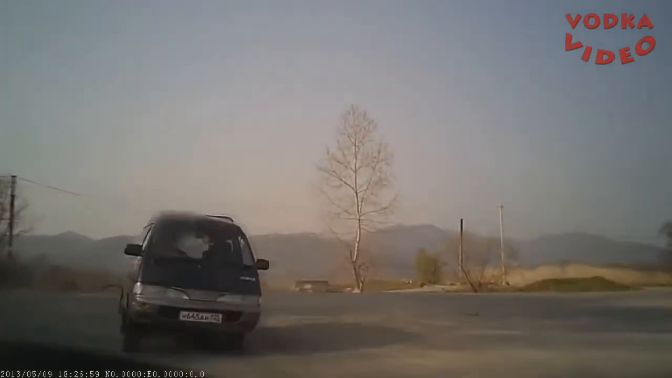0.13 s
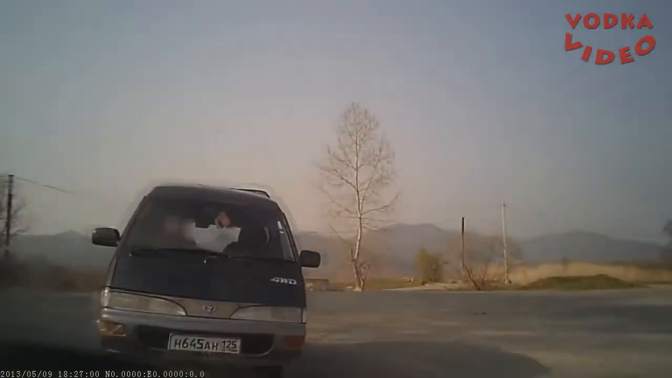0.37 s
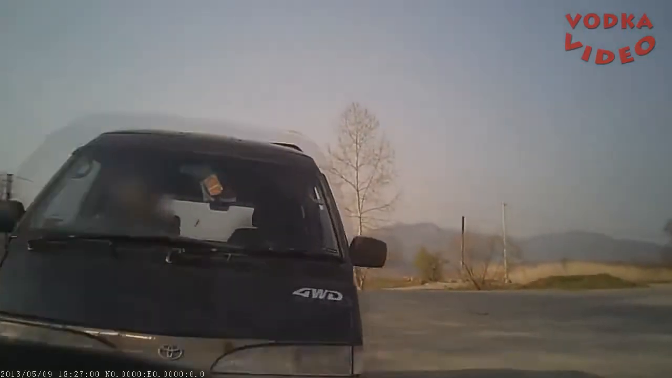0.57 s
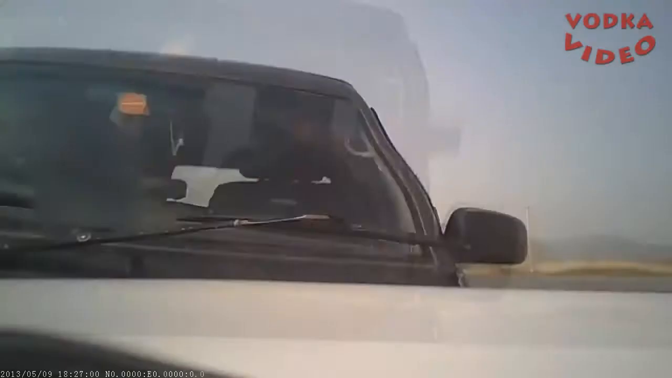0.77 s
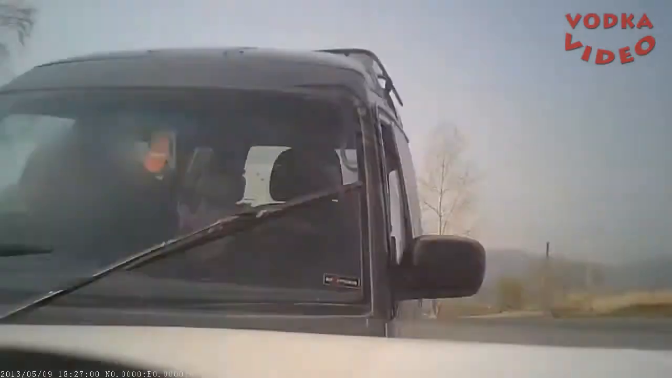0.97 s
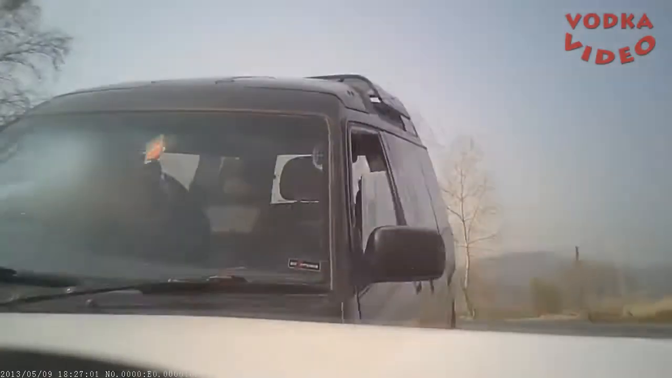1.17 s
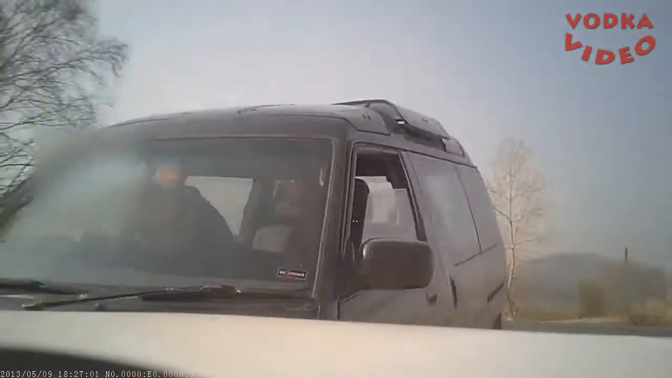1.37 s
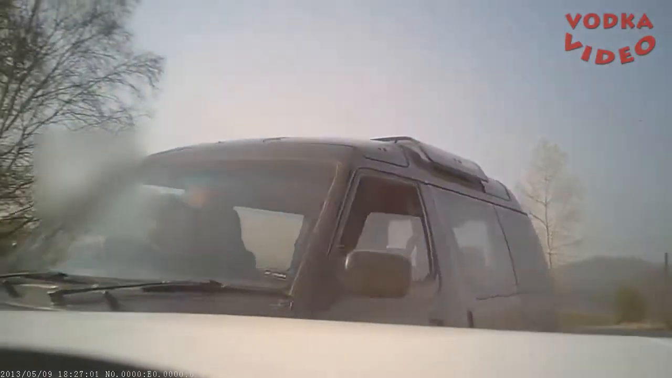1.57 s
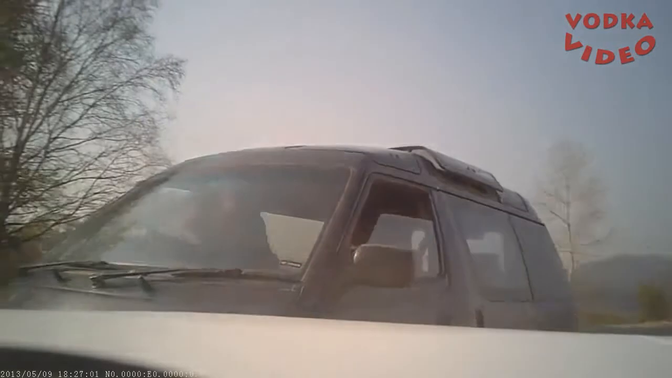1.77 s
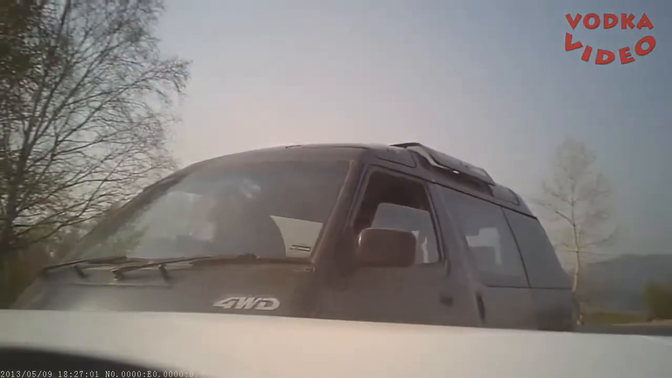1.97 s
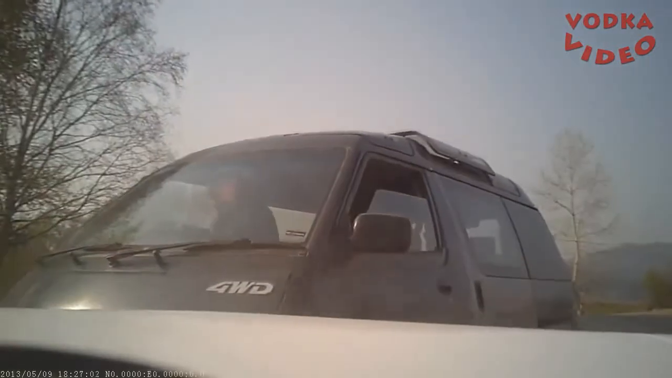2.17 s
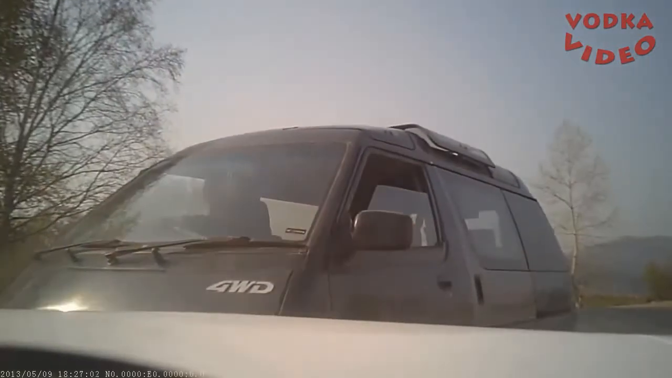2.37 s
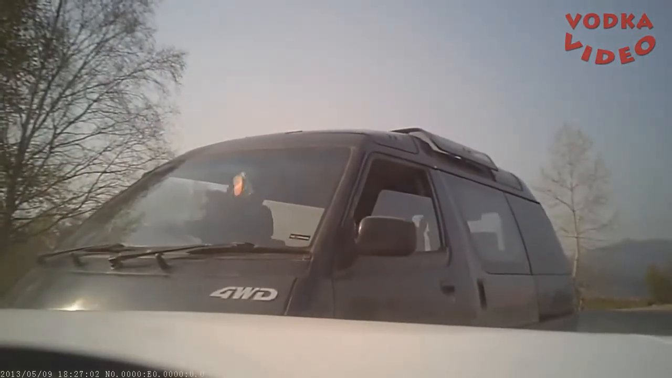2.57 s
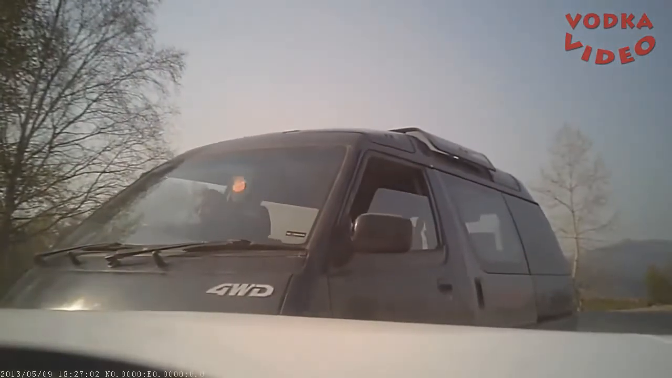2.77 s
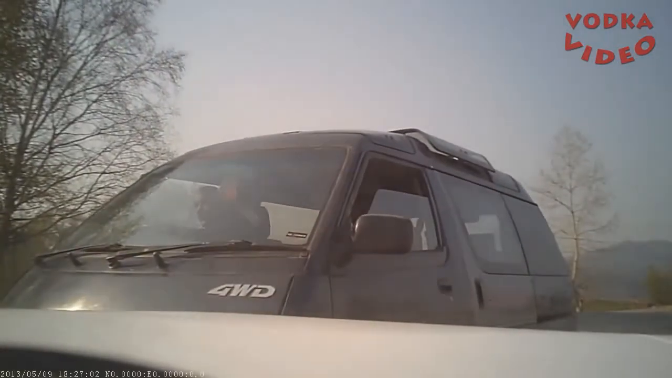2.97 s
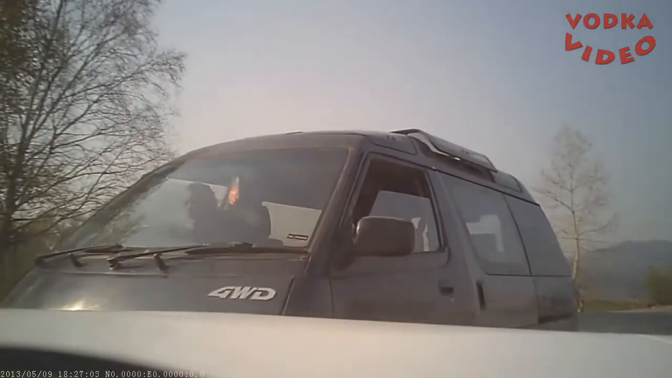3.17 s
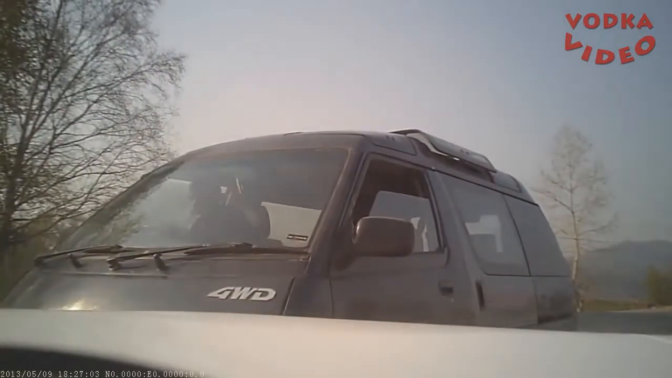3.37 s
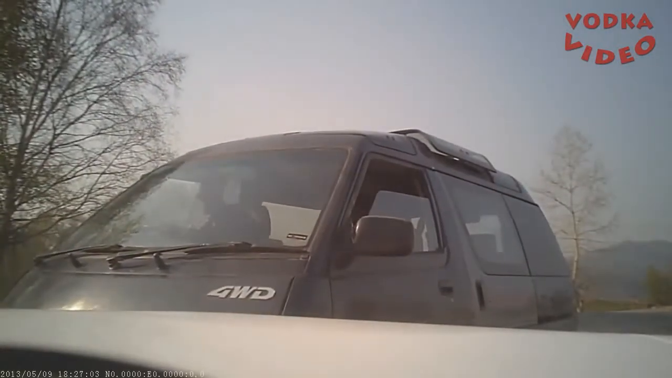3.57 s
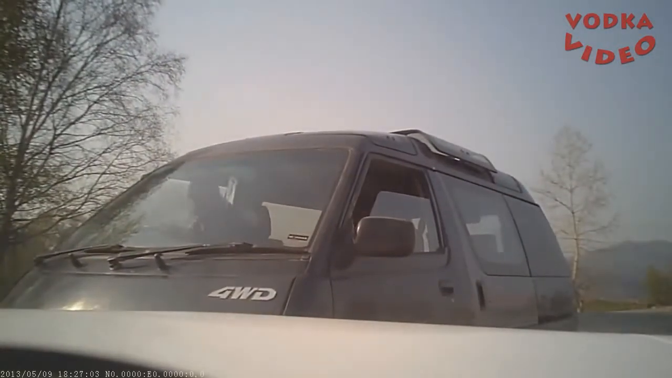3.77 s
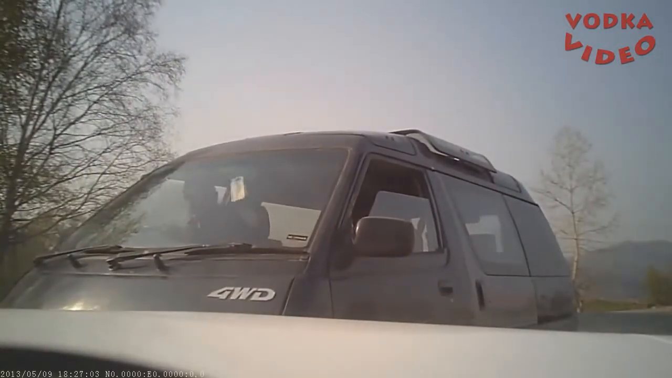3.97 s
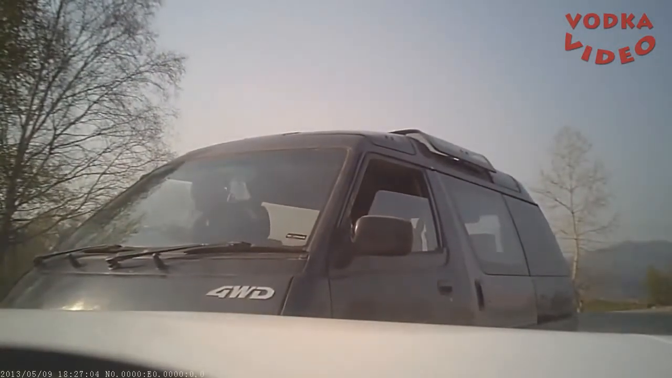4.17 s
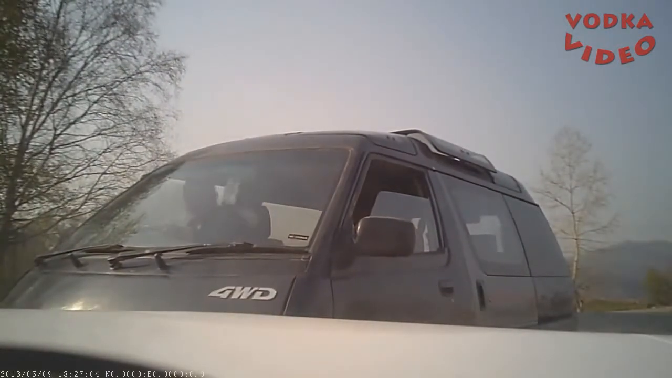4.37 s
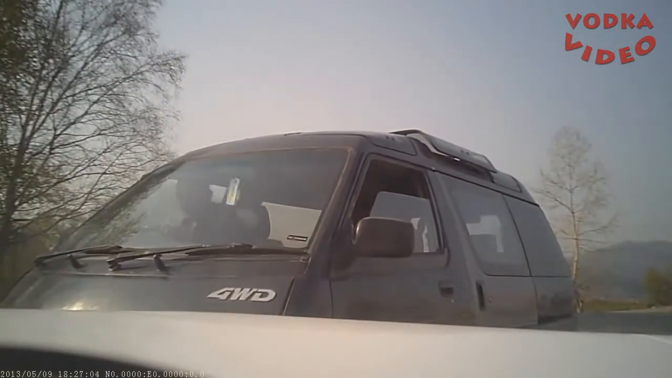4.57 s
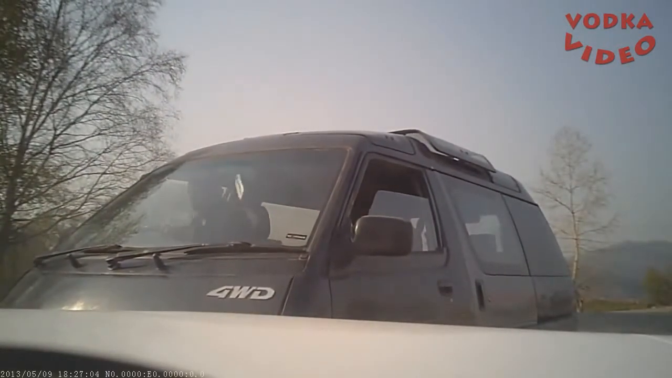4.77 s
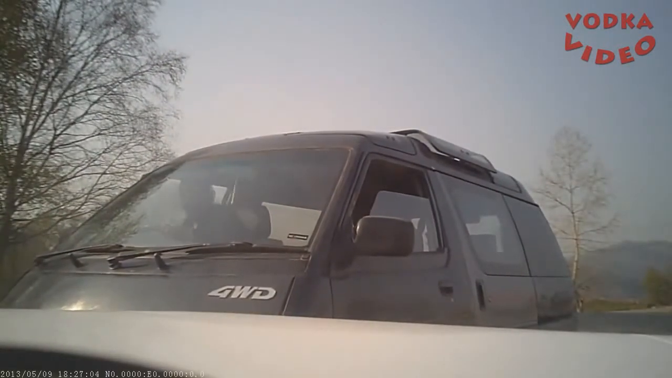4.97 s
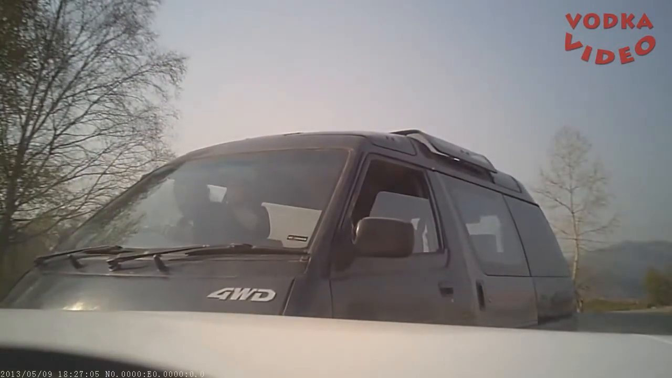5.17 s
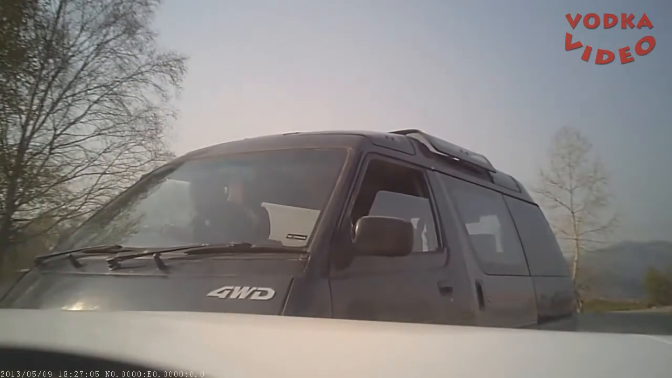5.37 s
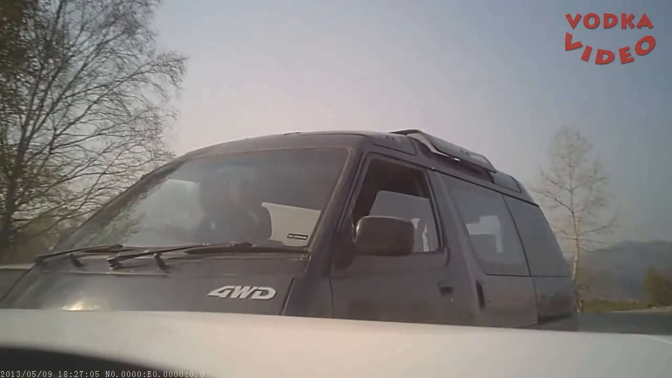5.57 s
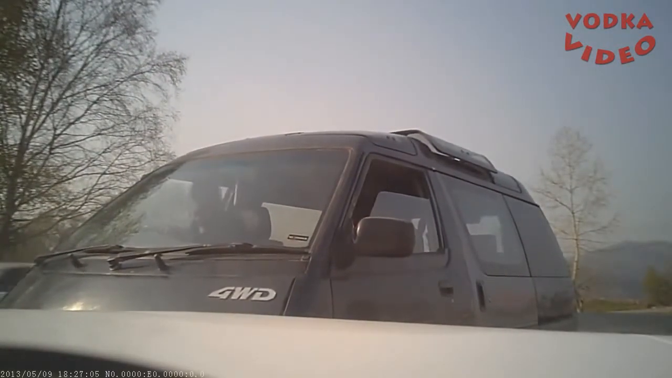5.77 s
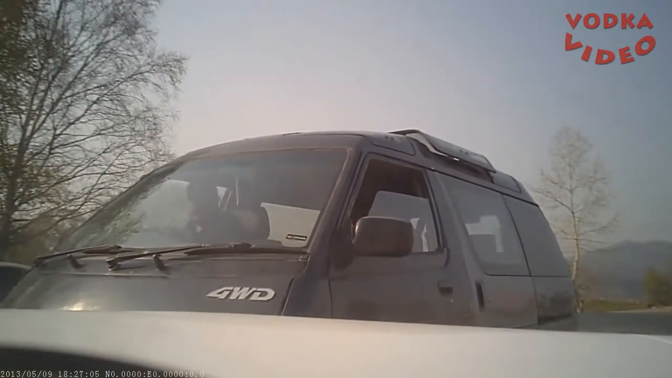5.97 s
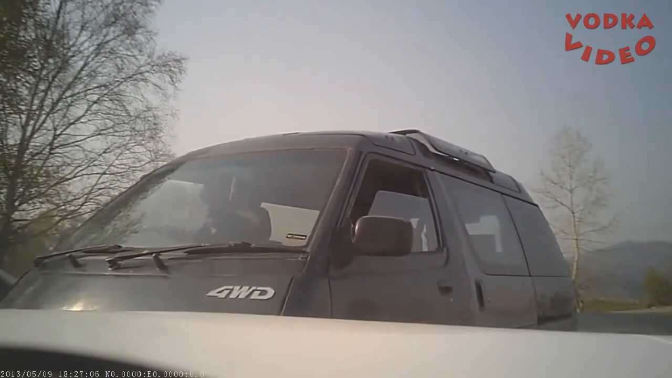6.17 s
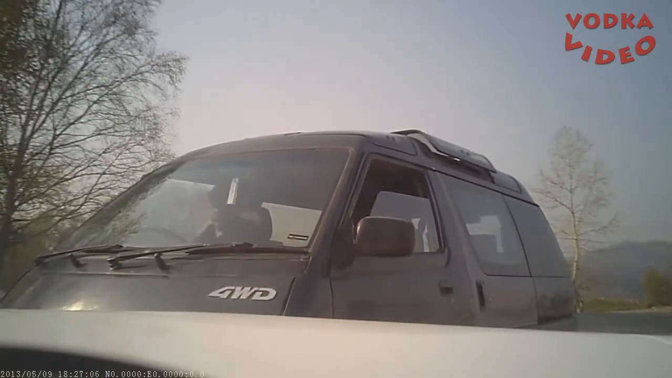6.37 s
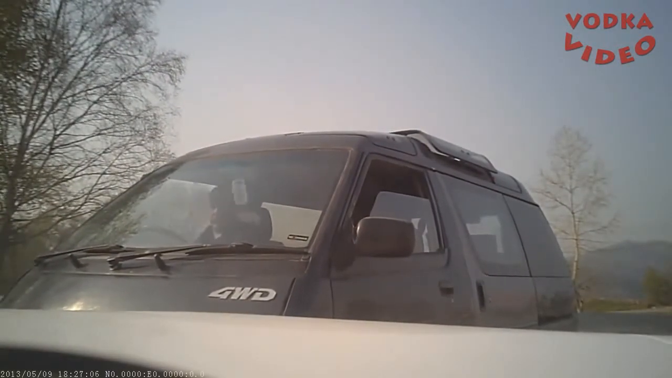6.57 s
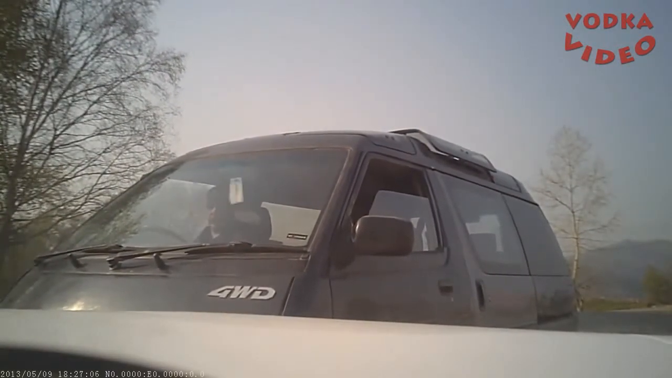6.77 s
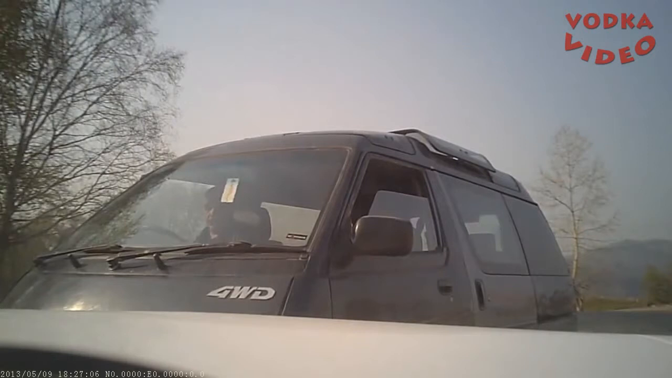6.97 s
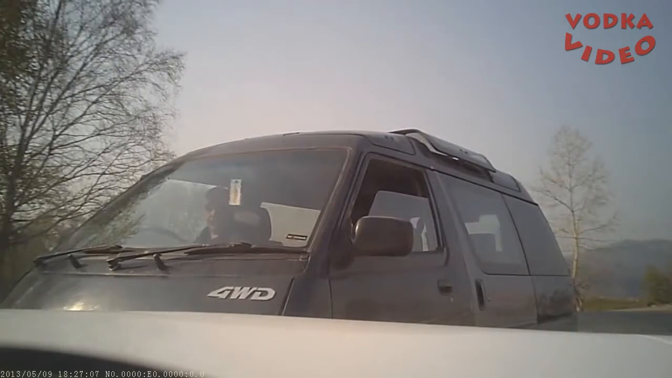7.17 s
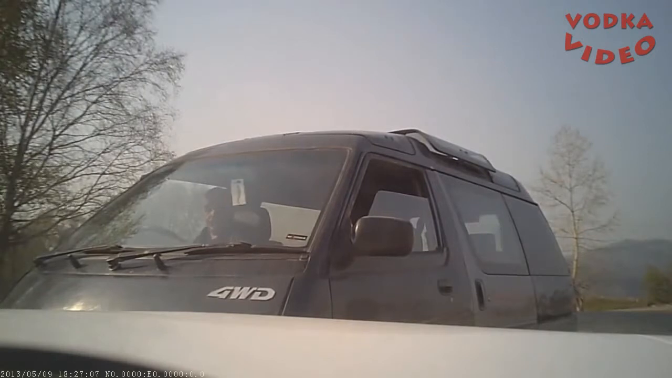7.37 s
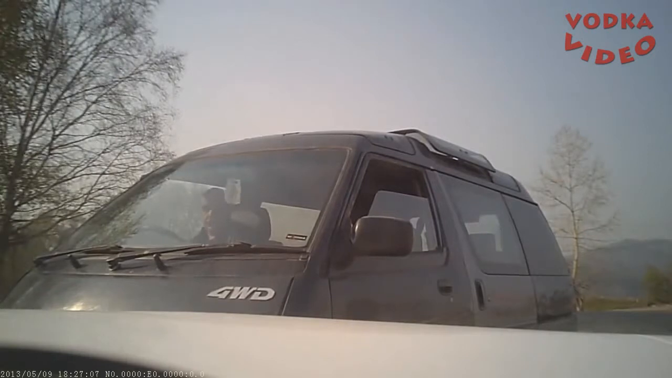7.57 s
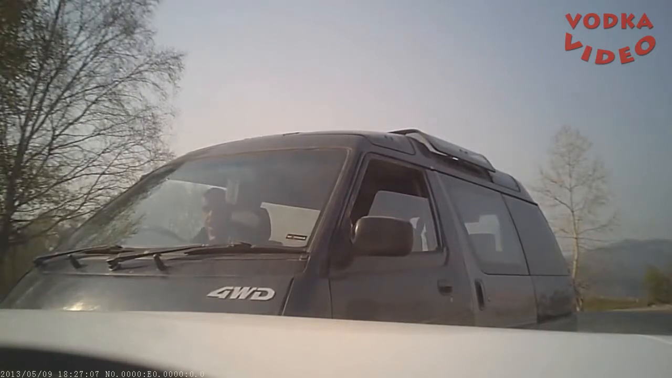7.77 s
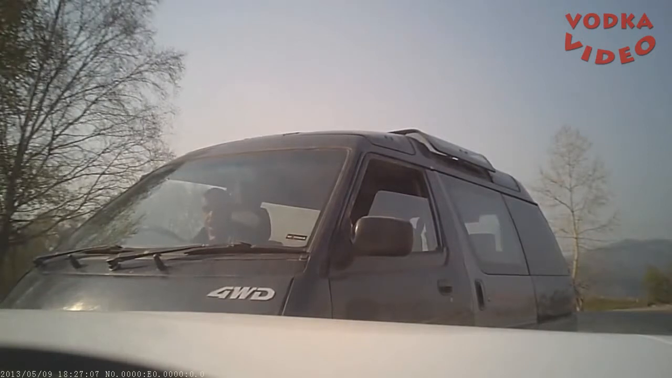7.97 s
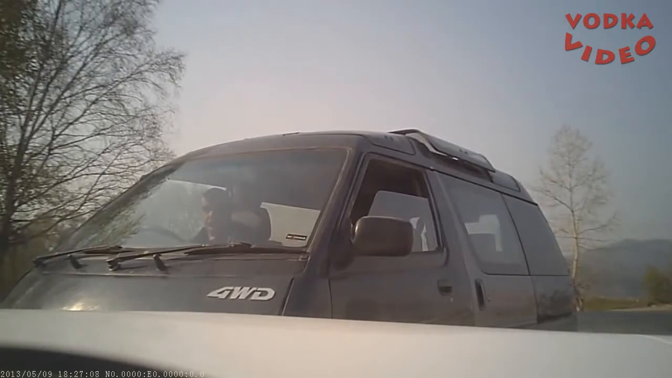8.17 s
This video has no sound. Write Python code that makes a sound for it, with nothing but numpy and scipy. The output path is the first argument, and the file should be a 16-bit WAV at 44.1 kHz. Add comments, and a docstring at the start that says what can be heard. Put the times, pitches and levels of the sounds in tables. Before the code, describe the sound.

Close, boxy cabin sound. Rumbling and rustling lead to a steady horn of under half a second, cut off by a massive metallic thud and bright glass burst that overloads the microphone. Heavy jolts, plastic clacks and small hard pieces follow, thinning out quickly. Afterwards come hiss, sparse soft knocks and small clicks as someone moves, while a low engine hum slowly emerges.

```python
"""Inside a car, heard by a small microphone at the windscreen: the horn sounds, a thin tone squeals,
then a van rams the side. The body drums and booms (shaped noise and low ringing tones), glass bursts
(a dense bright roar), and loose things rustle, clack and ring as they settle. Later someone moves
about the cabin with soft knocks while an engine hums at idle. The microphone overloads on the crash."""
import sys
import numpy as np
from scipy import signal
from scipy.fft import rfft, irfft, next_fast_len
from scipy.io import wavfile
from scipy.ndimage import uniform_filter1d, map_coordinates

SR = 44100
rng = np.random.default_rng(int(sys.argv[2]) if len(sys.argv) > 2 else 0)


def to_wav(s):
    """Save 16-bit WAV."""
    ch = np.atleast_2d(s).T  # columns
    pcm = np.round(np.clip(ch, -1, 1) * 32767)  # PCM
    wavfile.write(sys.argv[1], SR, pcm.astype(np.int16))


N = 362502

# How hard the body panels drum: (time [s], level [dB])
BODY_SHAKE = [(0, -40), (.3, -42), (.55, -43), (.87, -46), (.94, -21.5), (.98, -42.5), (1.1, -31.5),
              (1.28, -30.5), (1.5, -36), (1.76, -43), (1.99, -39), (2.25, -51), (2.45, -45.5),
              (2.65, -50.5), (3.04, -60), (3.23, -53.5), (3.87, -67), (5.08, -66), (5.21, -54), (5.32, -65),
              (5.84, -58.5), (6.08, -65), (6.2, -56.5), (6.4, -63), (6.52, -58), (6.62, -59.5), (6.75, -54),
              (6.95, -66.5), (7.95, -65.5), (8.22, -57.5)]
# Rustle of road grit, fragments and fabric: (time [s], bright level [dB], dull level [dB])
RUSTLE_LEVELS = [(0, -55, -46.5), (.1, -49.5, -51.5), (.418, -49, -46.5), (.532, -62.5, -56.5),
                 (.87, -66, -61), (1.03, -43.5, -43), (1.128, -43.5, -47), (1.206, -39.5, -37.5),
                 (1.538, -52.5, -45), (1.83, -60.5, -49.5), (1.978, -45.5, -48.5), (2.16, -53.5, -53),
                 (2.28, -57.5, -55), (2.42, -60.5, -58), (2.83, -57.5, -56.5), (3.05, -63, -62.5),
                 (3.31, -60, -57.5), (3.75, -65.5, -62.5), (4.09, -73.5, -71.5), (5.44, -73.5, -69.5),
                 (6.38, -69.5, -66.5), (6.79, -72.5, -69), (7.95, -73, -69.5), (8.12, -65, -62.5),
                 (8.22, -65, -66)]
# Jolts that make the cabin air boom: (time [s], level [dB], pitch [Hz])
CABIN_JOLTS = [(.004, -14, 43.6), (0.192, -13.5, 46), (0.388, -22.5, 42.2), (.509, -24, 32),
               (.873, -5.5, 31.2), (.919, -10, 51.2), (1.042, -8.5, 42.5), (1.097, -32, 40),
               (1.168, -21, 32.2), (1.212, -26, 38.6), (1.243, -8.5, 67.7), (1.345, -8.5, 52.5),
               (1.425, -16, 38), (1.478, -27, 32.6), (1.57, -17.5, 32.4), (1.652, -18.5, 60.4),
               (1.738, -22.5, 39), (1.868, -17, 48), (1.93, -19, 72.6), (1.99, -16.5, 31.5),
               (2.048, -18.5, 33), (2.178, -25.5, 53.8), (2.308, -32, 31.4), (2.309, -35.5, 301),
               (2.43, -20, 45.3), (2.558, -38, 35), (2.699, -40, 53), (2.95, -35.5, 32),
               (5.387, -33.5, 103), (5.609, -36, 48.8), (5.687, -39, 56.6), (5.87, -27, 46.6),
               (6.01, -39.5, 45.8), (6.145, -36.5, 99.6), (6.21, -35, 123.8), (6.697, -34.5, 54.6),
               (6.7, -37.5, 90), (7.031, -44.5, 128.7)]
# Blunt knocks on panels and trim:
# (time [s], level near 330 Hz [dB], deep part against it [dB], upper part against it [dB])
TRIM_KNOCKS = [(.179, -25.5, -24, -11.5), (0.358, -43.5, 7, -17), (.399, -27.5, -3.5, -19),
               (0.44, -25, -6.5, -17), (.881, -12, 1, -24), (.899, -11, 0.5, -9.5), (.924, -9.5, 0, -9.5),
               (1.013, -28, 6, 0), (1.248, -14, -2.5, -31), (1.28, -17, -2, -18), (1.345, -29, -17, -1),
               (1.398, -47, -10, 0), (1.5, -27.5, -15, -8), (1.62, -40, 10, -16), (1.836, -26.5, -10, -25),
               (1.901, -24.5, -15, -20), (1.969, -20, -13, -28), (2.418, -20, -37, -12),
               (2.535, -41, -30, -6), (2.905, -41.5, -19, -5), (3.232, -38, -15, -21),
               (3.346, -47.5, -14, -5), (4.328, -47, 2.5, -7.5), (4.737, -44.5, -13.5, -21),
               (4.795, -46, -6.5, -11), (5.226, -44, 0, -17), (5.39, -26, -0.5, -14),
               (5.688, -52.5, 7, -13), (5.771, -51, -13, -3), (5.824, -48.5, 1, 0),
               (5.861, -37, -2.5, -1.5), (6.004, -48.5, 2.5, -2.5), (6.205, -35, -10.5, -13.5),
               (6.214, -41, 3.5, 4), (6.238, -37.5, -5.5, -4), (6.257, -41, -2, -9),
               (6.526, -46, -3.5, -12.5), (6.68, -36, -9, 1), (6.714, -41.5, 0, -9),
               (7.004, -40.5, -22, -11.5), (7.08, -51, 2, -6.5), (7.276, -39.5, -22, -5),
               (7.328, -43.5, -23, -9), (7.672, -50, -15, -5)]
# Sharp clacks of plastic and glass:
# (time [s], upper level [dB], lower part against it [dB], time for the upper part to fall 60 dB [s])
SHARP_CLACKS = [(.1794, -47, 6, 0.13), (0.284, -30, 2, 0.08), (.3521, -49, 10, 0.16), (.418, -48, 5, 0.11),
                (0.8745, -31, 5, 0.34), (0.9034, -14, -19, 0.05), (0.9237, -24, -1, 0.076),
                (1.009, -18.5, -2.5, 0.056), (1.0344, -35, -17, 0.055), (1.1094, -33, -3.5, 0.057),
                (1.1294, -31.5, -7, 0.043), (1.1748, -27.5, -18, .062), (1.201, -34.5, -9, 0.077),
                (1.244, -21.5, -1.5, .12), (1.274, -23, -11, 0.064), (1.3416, -24.5, 0, 0.09),
                (1.3994, -28, -4, 0.046), (1.445, -35, -20, 0.058), (1.4963, -37.5, 2, 0.076),
                (1.5584, -41, -16, 0.095), (1.619, -34.5, 2.5, 0.1), (1.7497, -27, -4.5, 0.052),
                (1.796, -32, -12, .078), (1.831, -40, -4.5, 0.17), (1.9026, -24.5, -4.5, 0.098),
                (1.9357, -24.5, -10.5, 0.12), (1.969, -24, -5.5, 0.054), (2.0105, -39.5, -20, 0.17),
                (2.048, -36, -9, 0.066), (2.127, -36, -7, .07), (2.382, -45.5, -3.5, 0.13),
                (2.409, -44, 2, 0.28), (2.463, -46.5, -9, .16), (2.5166, -40.5, -27, 0.12),
                (2.5516, -47, -6, .087), (2.573, -35.5, -2.5, 0.038), (2.9203, -52, -4, .13),
                (3.1695, -52.5, -4, .24), (3.349, -50, 0, 0.32), (3.388, -57.5, 2, 0.35),
                (3.698, -58, 4, 0.068), (3.8087, -56, -8, .11), (4.5101, -55.5, 5.5, 0.052),
                (5.085, -57.5, -8.5, 0.079), (5.129, -56, -11, .07), (5.3656, -38, -8.5, 0.088),
                (5.3854, -44.5, 4, 0.057), (5.6128, -52, -8.5, 0.062), (5.681, -49.5, -1, .06),
                (5.8524, -44.5, 1, 0.073), (5.8637, -32, -5, 0.053), (5.999, -53.5, 1.5, 0.1),
                (6.037, -46.5, -7, 0.07), (6.2272, -52.5, 0.5, 0.068), (6.251, -52.5, -2.5, 0.11),
                (6.3194, -59, -1, .11), (6.486, -55.5, -4, 0.059), (6.659, -50, 8.5, 0.13),
                (6.6814, -53, 8, .059), (6.701, -51, -2, .069), (7.0846, -52.5, -2.5, 0.068),
                (7.1307, -59, 10.5, 0.034), (7.279, -58, -11, .058)]
# Tones of small hard pieces landing: (time [s], level [dB], pitch [Hz], time to fall 60 dB [s])
LANDING_PINGS = [(1.06, -37, 7600, .06), (1.07, -38, 5600, 0.11), (1.075, -44, 9500, .06),
                 (1.09, -34, 8240, 0.16), (1.11, -37, 8800, 0.17), (1.12, -35, 6000, .08),
                 (1.125, -40, 4370, .12), (1.118, -33, 6900, .1), (1.14, -27, 6800, 0.092),
                 (1.177, -25, 3200, 0.032), (1.4, -31, 796, 0.063), (1.623, -15.5, 1280, 0.031),
                 (1.623, -26, 2860, 0.02), (1.752, -18, 1390, 0.012), (1.94, -27, 3370, 0.063),
                 (1.975, -27, 7500, .04), (2.012, -31, 1595, 0.056), (2.012, -37, 2400, .066),
                 (2.012, -38, 3520, 0.092), (2.012, -36, 4670, .07), (2.06, -44, 4650, .12),
                 (2.13, -35.5, 4780, 0.037), (2.13, -40, 2620, 0.035), (2.385, -51.5, 2900, .15),
                 (2.4, -52, 9200, .06), (2.425, -28, 660, 0.067), (2.47, -46, 6200, 0.15),
                 (2.47, -46, 6600, .05), (2.52, -45, 1610, 0.055), (2.52, -40, 7700, 0.056),
                 (2.578, -41, 1725, 0.17), (2.578, -55, 3440, .13), (2.578, -39.5, 6060, 0.14),
                 (2.585, -53, 5460, 0.35), (3.35, -46, 1300, 0.069), (3.987, -49, 5350, 0.042),
                 (3.987, -41.5, 5750, 0.042), (3.987, -41.5, 6070, 0.028), (6.682, -36, 1750, 0.031),
                 (7.131, -44, 898, 0.024)]
# Horn: (time [s], pitch [Hz], level [dB], loss for each step up the overtones [dB])
HORN_COURSE = [(.37, 375.6, -68, 8), (.43, 371.5, -37, 2), (.46, 375.4, -30.5, 3.5),
               (.5, 379.1, -39.5, 0.36), (.872, 379.4, -40.5, 0.34), (.885, 379, -84.5, -0.5)]
# Strength of each horn tone before that loss: (multiple of the pitch [count], level [dB])
HORN_OVERTONES = [(1, -3.5), (2, -19), (3, -27.5), (4, -11), (5, -0.5), (6, -10), (7, -18.5), (8, -10.5),
                  (9, -16), (10, -20.5), (11, -16), (12, -23.5), (13, -26.5), (14, -13), (15, -30.5),
                  (16, -43.5), (17, -21), (18, -25), (19, -36.5), (20, -27), (21, -40), (22, -43),
                  (23, -31), (24, -36.5)]
# Idling engine: (time [s], firing pitch [Hz], level [dB])
ENGINE_IDLE = [(2.6, 44.7, -71), (3.5, 45.53, -64.5), (4.15, 47.08, -52), (4.97, 49.32, -50.5),
               (5.7, 53.2, -47), (6.3, 54.5, -46.5), (8.22, 54.7, -43)]
# Natural tones of the cabin trim: (pitch [Hz], level [dB])
TRIM_MODES = [(105, -1.5), (135, 2.5), (185, -0.5), (240, -5), (270, -4.5), (315, -2), (365, -9), (425, -3),
              (520, -4), (640, 0), (760, -4), (900, -10.5), (1150, -3.5), (1450, -10.5)]

# Noise colours, only their shape matters: (frequency [Hz], relative level [dB])
BOOM_COLOUR = [(8.8, -53), (15, -4.5), (55, -7.5), (77, -15.5), (110, -23.5), (150, -59.5), (240, -120)]
PANEL_COLOUR = [(47, -42), (90, -13.5), (160, -10.5), (260, -8.5), (380, -13.5), (500, -21), (600, -28),
                (700, -24), (910, -26), (1540, -120)]
TYRE_COLOUR = [(50, -40.5), (75, -6.5), (115, 2), (155, -4.5), (210, -42)]
BRIGHT_COLOUR = [(1470, -22), (2500, -1), (2680, -10), (3320, -2.5), (3660, -4), (5160, -2.5), (7060, 4),
                 (7680, 0.5), (10100, -11.5), (15500, -33)]
DULL_COLOUR = [(260, -1.5), (450, -6), (857, -4.5), (1060, -7), (1250, -7.5), (1360, -4.5), (3500, -14),
               (4550, -22), (7700, -120)]
SNAP_COLOUR = [(1500, -31.5), (2500, -3), (3500, -5.5), (5200, -2.5), (7300, 1.5), (9000, -12.5),
               (12000, -22), (15500, -27)]
GLASS_COLOUR = [(180, -23.5), (300, 2.5), (378, -5.5), (720, -6.5), (878, -3), (1730, -5.5), (2750, -1.5),
                (3190, -7.5), (3460, -1.5), (5200, -3), (7290, 4), (9500, -6.5), (15600, -19.5)]
HISS_COLOUR = [(35, -29.5), (60, 10), (77, -35.5), (98, -11.5), (152, -19.5), (292, -22.5), (1050, -22),
               (7230, -30.5), (13200, -30.5), (15600, -43.5)]

# The boom swings wider than the drumming (dB per dB) and swells by chance
BOOM_DB, BOOM_GROWS, BOOM_SWELL_DB = 25.5, 1.402, 4
JOLT_T60_S, JOLT_RISE_S = .24, .0031  # T60 is the time to fall 60 dB
KNOCK_T60_S, KNOCK_HZ = 0.078, 330  # ring time at this pitch
CLACK_RISE_S, LOW_LASTS = .0027, 1.4  # the lower part rings this many times longer
BURST_S, BURST_DB, BURST_RISE_S = .9455, -8.5, 0.00053  # when and how the glass lets go
ROAR_S, ROAR_SAG_DB_PER_S, COLLAPSE_DB_PER_S = 0.059, 83, 1098.5
CRUMB_DB, CRUMB_FOLLOWS = -11, 0.88  # base level, and dB per dB of bright rustle
SQUEAL_S, SQUEAL_SWELL_S, SQUEAL_HZ, SQUEAL_DB = (0.59, 0.95), 0.073, 3262, -60
ROLL_DB, STOP_S, STOP_DB_PER_S = -3, 2.6, 40  # level against the drumming; fade once the car stands
HORN_WAVER_HZ = .3
HISS_DB, TOP_HZ = -60.5, 15740


def amp(db):
    """Turn decibels into a plain multiplier."""
    return 10 ** (np.asarray(db) / 20)


def unit(x):
    """Scale to an rms of 1."""
    return x / np.sqrt(np.mean(x ** 2) + 1e-20)


def curves(rows):
    """Draw straight lines between rows: one curve for each column after the time."""
    times, *columns = np.transpose(rows)
    return [np.interp(np.arange(N) / SR, times, column) for column in columns]


def wobble(rate):
    """A smooth random curve through this many random points a second."""
    points = rng.standard_normal(int(N * rate / SR) + 4)
    return map_coordinates(points, [np.arange(N) * rate / SR])


def filtered(x, response):
    """Reshape a sound by a gain that depends on frequency."""
    size = next_fast_len(N + 8192)
    spectrum = rfft(x, size) * response(np.fft.rfftfreq(size, 1 / SR))
    return irfft(spectrum, size)[..., :N]


def noise(colour, grain_db=0, rate=100, patchy_db=0):
    """Coloured noise of rms 1: grain flutters the whole, patches vary across time and pitch."""
    white = rng.standard_normal(N) * amp(grain_db * wobble(rate))
    cells = signal.stft(white, nperseg=256)[2]
    patches = rng.standard_normal(cells.shape)
    patches = uniform_filter1d(patches, size=3, axis=0)
    patches = unit(uniform_filter1d(patches, size=6, axis=1))
    patchy = signal.istft(cells * amp(patchy_db * patches), nperseg=256)[1][:N]
    f, db = np.transpose(colour)
    return unit(filtered(patchy, lambda hz: amp(np.interp(np.log(hz + 1), np.log(f + 1), db))))


def decay(t, db, t60, rise):
    """A quick rise under an exponential fall."""
    return amp(db - 60 * t / t60) * (1 - np.exp(-t / rise))


def blows(rows, rise):
    """A loudness curve made of blows: rows (time, dB, t60)."""
    out, t = np.zeros(N + SR), np.arange(SR // 2) / SR
    for s, db, t60 in rows:
        out[round(s * SR):][:len(t)] += decay(t, db, t60, rise)
    return out[:N]


def rings(rows, rise):
    """Tones that die away: rows (time, dB, Hz, t60)."""
    out, t = np.zeros(N + SR), np.arange(SR // 3) / SR
    for s, db, hz, t60 in rows:
        out[round(s * SR):][:len(t)] += decay(t, db, t60, rise) * np.sin(2 * np.pi * hz * t)
    return out[:N]


def engine():
    """The engine's firing makes a slightly unsteady low tone with a weak overtone."""
    hz, db = curves(ENGINE_IDLE)
    phase = 2 * np.pi * np.cumsum(hz + .8 * wobble(9.2)) / SR
    tone = np.sin(phase) + amp(-23.0) * np.sin(2 * phase)
    return amp(db + 1.2 * wobble(5.7)) * tone


def tyres(panel_db):
    """Tyres rumble on the road, following the panels' drumming, and fade once the car stands."""
    standing_s = np.maximum(np.arange(N) / SR - STOP_S, 0)
    level_db = panel_db + ROLL_DB - STOP_DB_PER_S * standing_s
    return amp(level_db) * noise(TYRE_COLOUR, grain_db=1.5, rate=15)


def horn():
    """A buzzing diaphragm gives a stack of overtones, each wavering in level by itself."""
    hz, db, loss_db = curves(HORN_COURSE)
    phase = 2 * np.pi * np.cumsum(hz + HORN_WAVER_HZ * wobble(16)) / SR
    starts = rng.uniform(0, 2 * np.pi, len(HORN_OVERTONES))
    out = np.zeros(N)
    for (k, level_db), start in zip(HORN_OVERTONES, starts):
        out += amp(db + level_db - k * loss_db + 1.3 * wobble(8.4)) * np.sin(k * phase + start)
    return out


def squeal():
    """A thin unsteady tone, perhaps a brake: it swells, holds, then stops short."""
    t = np.arange(N) / SR
    start, stop = SQUEAL_S
    swell = np.clip((t - start) / SQUEAL_SWELL_S, 0, 1) * (t < stop)
    phase = 2 * np.pi * np.cumsum(SQUEAL_HZ + 12 * wobble(41.4)) / SR
    return swell * amp(SQUEAL_DB + 2.5 * wobble(30)) * np.sin(phase)


def rustle(bright_db, dull_db):
    """Many small rubs blur into bright and dull noise that flutters together."""
    flutter = amp(1.3 * wobble(24) + 1.5 * wobble(60))
    bright = amp(bright_db) * noise(BRIGHT_COLOUR, patchy_db=2.0)
    dull = amp(dull_db) * noise(DULL_COLOUR, grain_db=1.0, rate=96, patchy_db=2.0)
    return flutter * (bright + dull)


def crumbs(bright_db, count):
    """Crumbs of glass and grit each ring briefly, louder where the bright rustle is louder."""
    when, pitch, size, life = rng.random((count, 4)).T
    rustle_db = bright_db[(when * N).astype(int)]
    db = CRUMB_DB + CRUMB_FOLLOWS * rustle_db - 3 * np.log(size + 0.036)  # a few are much louder
    hz = 1500 * 5.4 ** np.sqrt(pitch)
    return rings(zip(when * N / SR, db, hz, 0.0098 + 0.049 * life), rise=0.00071)


def pings():
    """Small hard pieces ring as they land, their loudness wavering at random."""
    return amp(1.8 * wobble(70)) * rings(LANDING_PINGS, rise=0.00103)


def clacks():
    """Plastic and glass strike sharply: a burst of upper noise over a longer lower one."""
    upper = blows([(s, db, t60) for s, db, _, t60 in SHARP_CLACKS], CLACK_RISE_S)
    lower_rows = [(s, db + low_db, t60 * LOW_LASTS) for s, db, low_db, t60 in SHARP_CLACKS]
    lower = blows(lower_rows, CLACK_RISE_S)
    snap = upper * noise(SNAP_COLOUR, grain_db=2.0, rate=500, patchy_db=1.7)
    return snap + lower * noise(DULL_COLOUR, grain_db=0.5, rate=510, patchy_db=2.5)


def knocks():
    """Every knock wakes the trim's modes at new strengths; high modes die sooner."""
    hz, mode_db = np.transpose(TRIM_MODES)
    ring_s = KNOCK_T60_S * (hz / KNOCK_HZ) ** -.3
    bends = np.log([150, KNOCK_HZ, 700, 1500])
    chance = rng.standard_normal((len(TRIM_KNOCKS), 2, len(hz)))
    rows = []
    for (s, db, deep_db, upper_db), (strength, tune) in zip(TRIM_KNOCKS, chance):
        tilt_db = np.interp(np.log(hz), bends, [deep_db, 0, upper_db, upper_db - 8.5])
        level_db = db + mode_db + tilt_db + 1.8 * strength
        starts = s + 0.0014 * np.abs(tune)  # modes start slightly apart
        rows += zip(starts, level_db, hz * (1 + 0.049 * tune), ring_s)
    return rings(rows, rise=0.0025)


def drumming(panel_db):
    """The car's shaken shell drums as mid-low noise."""
    return amp(panel_db + 1.5 * wobble(4)) * noise(PANEL_COLOUR, grain_db=3.5, rate=30)


def boom(panel_db):
    """The cabin air booms with the shaking, and rings at a pitch of its own after each jolt."""
    boom_db = BOOM_DB + BOOM_GROWS * panel_db + BOOM_SWELL_DB * wobble(9)
    jolts = rings([(*jolt, JOLT_T60_S) for jolt in CABIN_JOLTS], rise=JOLT_RISE_S)
    return amp(boom_db) * noise(BOOM_COLOUR) + jolts


def glass():
    """A pane lets go all at once: a dense bright roar that sags, then dies away fast."""
    t = np.maximum(np.arange(N) / SR - BURST_S, 0)
    db = BURST_DB - ROAR_SAG_DB_PER_S * t - COLLAPSE_DB_PER_S * np.maximum(t - ROAR_S, 0)
    return amp(db) * (1 - np.exp(-t / BURST_RISE_S)) * noise(GLASS_COLOUR)


def scene():
    """Add up all the sources, from the background to the crash."""
    panel_db, = curves(BODY_SHAKE)
    bright_db, dull_db = curves(RUSTLE_LEVELS)
    background = engine() + tyres(panel_db) + horn() + squeal()
    debris = rustle(bright_db, dull_db) + crumbs(bright_db, count=2200) + pings() + clacks()
    crash = knocks() + drumming(panel_db) + boom(panel_db) + glass()
    return (background + debris + crash)[None]


def record(dry):
    """The microphone drops the deepest lows, overloads softly, dulls the top and adds hiss."""
    ceiling, hardness = .46, 5.5
    dry = filtered(dry, lambda hz: 1j * hz / (8 + 1j * hz))  # weakens what lies below 8 Hz
    wet = dry / (1 + np.abs(dry / ceiling) ** hardness) ** (1 / hardness)
    # the treble falls away around 9500 Hz
    wet = filtered(wet, lambda hz: 1 / (1 - (hz / 9500) ** 2 + 1j * hz / 9500 / 0.68))
    wet = wet + amp(HISS_DB) * noise(HISS_COLOUR)
    return filtered(wet + .0032, lambda hz: hz < TOP_HZ)  # small constant offset, then a sharp cut


dry = scene()
out = record(dry)
to_wav(out)
```